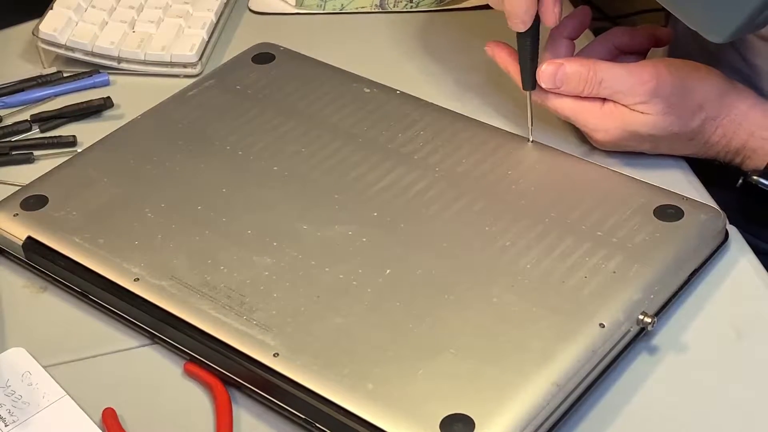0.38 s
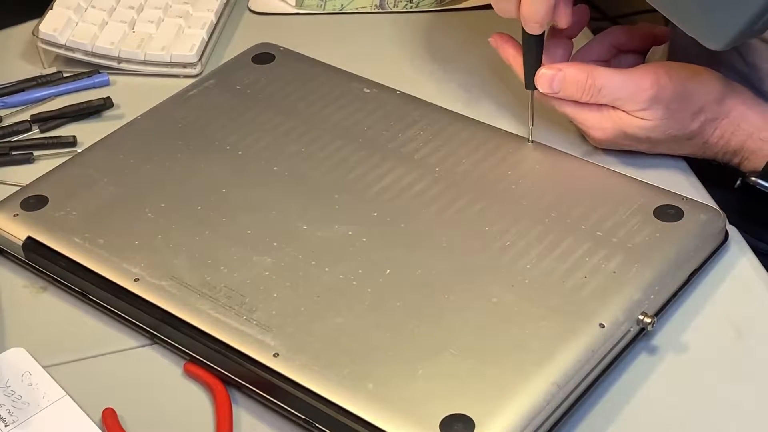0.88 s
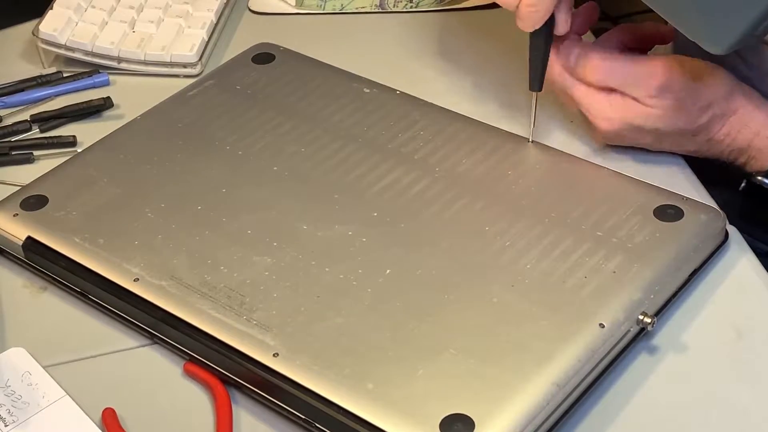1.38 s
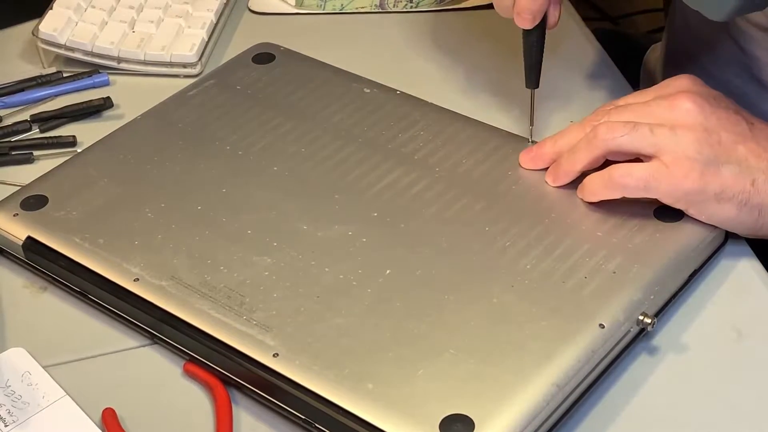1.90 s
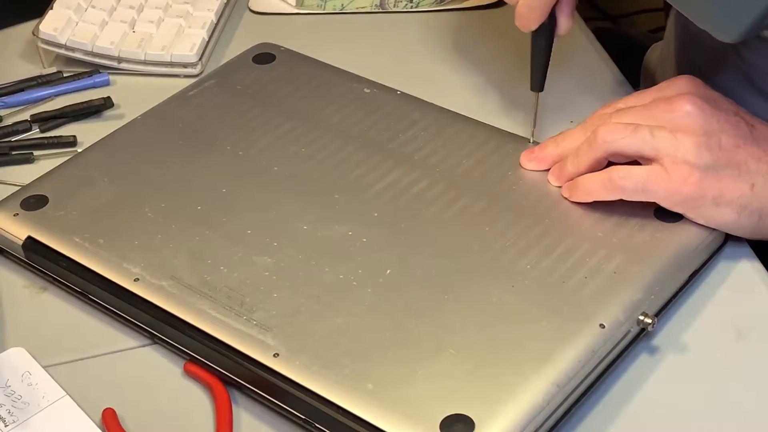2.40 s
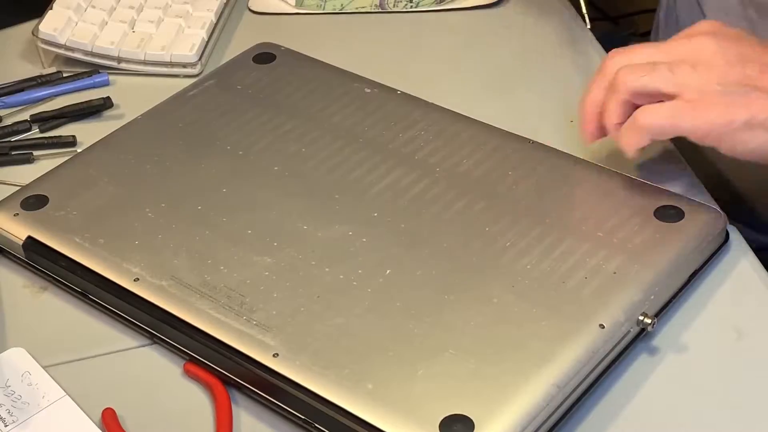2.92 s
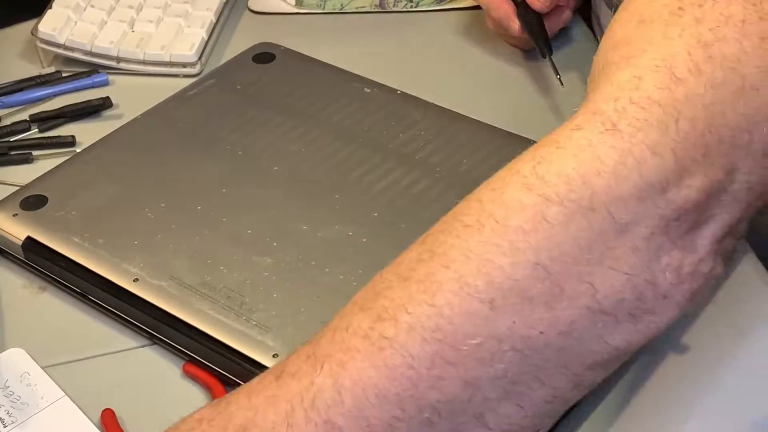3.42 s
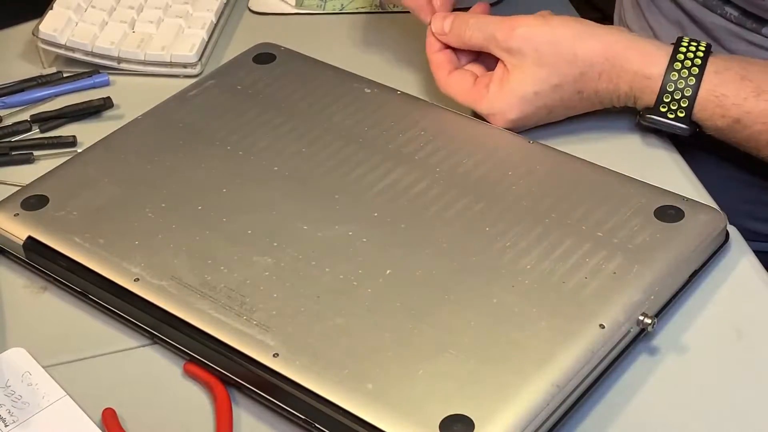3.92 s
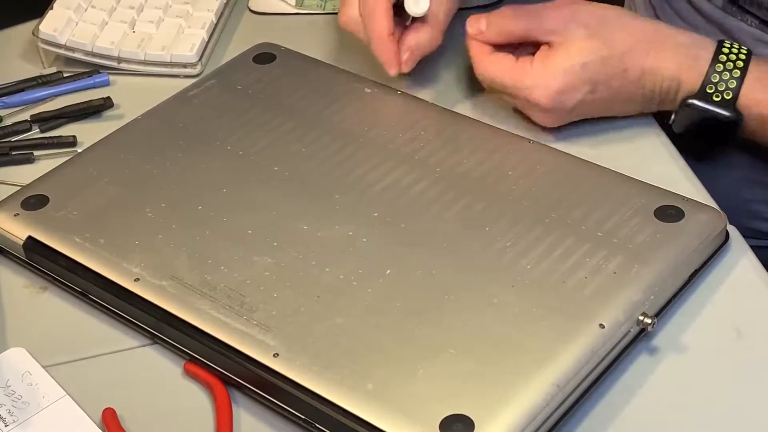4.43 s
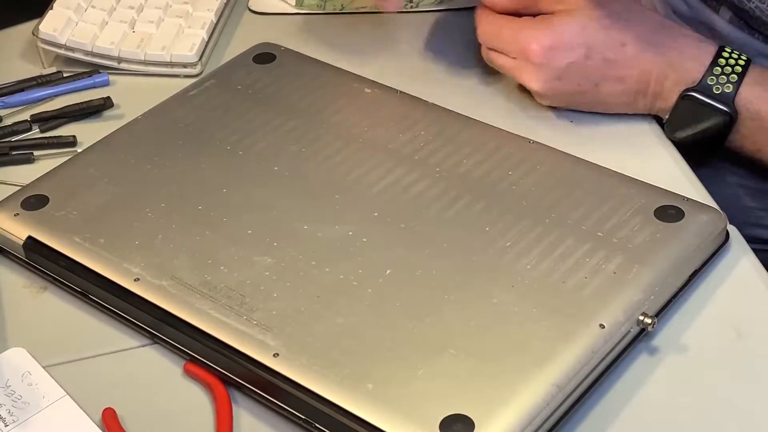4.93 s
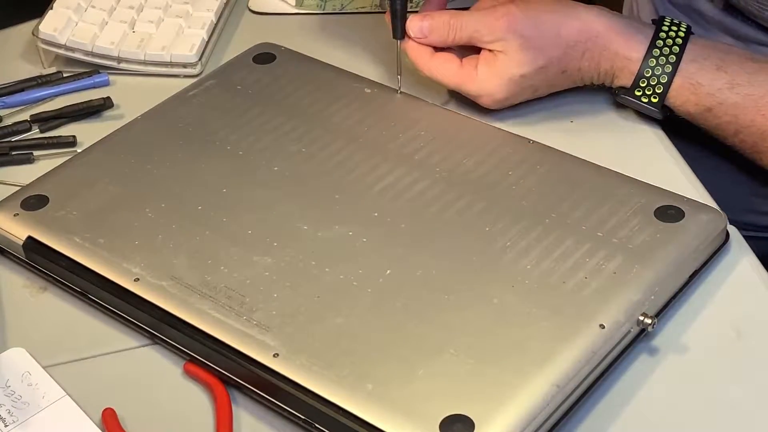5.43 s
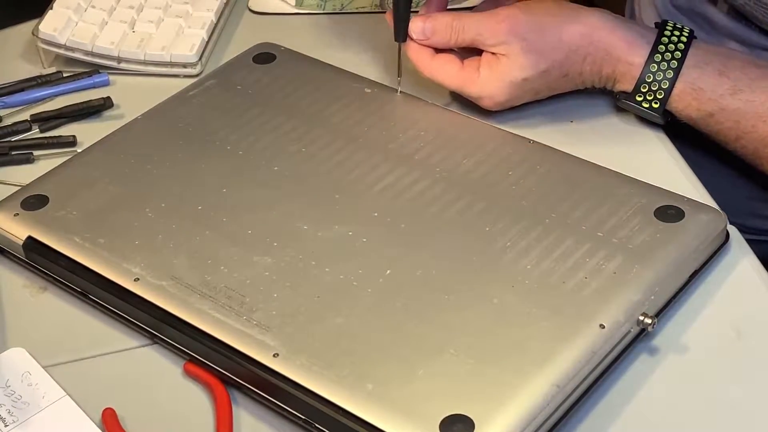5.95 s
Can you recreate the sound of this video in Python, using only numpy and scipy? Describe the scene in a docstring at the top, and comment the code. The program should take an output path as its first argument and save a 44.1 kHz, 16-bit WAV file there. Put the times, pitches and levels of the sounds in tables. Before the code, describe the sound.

Sparse light metallic clicks and dull little knocks on a thin metal case, clustering around four seconds, then a brief scrape and near silence.

```python
"""On a desk in a small room, a small screwdriver and loose screws tick and knock on a metal laptop case.
Each knock is a noisy crack, a set of fading case tones and a late desk thud; steel parts ring thinly.
One short scrape and faint finger rubs are made of many tiny clicks sent through ringing filters.
The room answers with fading noise; below lie filtered-noise rumble, whirr and hiss, and a wavering hum."""
import sys
import numpy as np
from scipy import signal
from scipy.fft import rfft, irfft, next_fast_len
from scipy.io import wavfile

SR = 44100
rng = np.random.default_rng(int(sys.argv[2]) if len(sys.argv) > 2 else 0)


def transcribe(u):
    """Save the signal u as a 16-bit wav file named by the first command-line argument.

    u: samples, shape (n,) or (channels, n), limited to [-1, 1]; the rate is SR.
    q: integer samples, one column per channel.
    """
    v = np.clip(np.atleast_2d(u).T, -1, 1)
    q = np.round(v * 32767).astype(np.int16)
    wavfile.write(sys.argv[1], SR, q)


def gain_from_db(level_db):
    """Convert decibel levels to linear amplitude factors (20 dB per decade)."""
    decades = np.asarray(level_db, float) / 20
    return 10 ** decades


N = 267731   # length in samples

# Slow swell of the background: [t/s, rumble level/dB, whirr level/dB]
BACKGROUND_SWELL = [(0.0, -70, -83), (0.5, -67, -83), (1.1, -68.5, -81), (1.7, -67.5, -82),
                    (2.3, -65.5, -91), (2.75, -67, -88), (3.2, -64.5, -81), (4.0, -64.5, -80.5),
                    (4.4, -65.5, -91), (5.2, -70.5, -83.5), (5.5, -68, -90.5), (6.07, -67.5, -88)]
# Colour of the building's rumble, relative levels: [f/Hz, level/dB]
RUMBLE_COLOUR = [(15, -47.5), (25, -17), (64, -1.5), (130, -6.5), (160, -7.5), (184, -17.5), (220, -4),
                 (255, -15), (325, -23.5), (361, -22), (407, -20), (445, -26.5), (708, -21), (900, -42.5),
                 (1170, -77), (1980, -120)]
# Colour of the microphone hiss, relative levels: [f/Hz, level/dB]
HISS_COLOUR = [(300, 2), (900, -0.5), (2000, -3), (5000, -6), (9000, -7), (13000, -2.5), (15500, -3)]
# Path of the low hum: [t/s, pitch f/Hz, level/dB]
HUM_PATH = [(3.45, 215.5, -78), (3.52, 217.8, -68), (3.624, 217.5, -66.5), (3.68, 221.6, -52),
            (3.75, 230.6, -75), (3.82, 232.6, -67.5), (3.95, 234.3, -64), (4.066, 233.3, -57.5),
            (4.19, 243.2, -49), (4.25, 240, -83), (4.56, 218, -86), (4.6, 221, -78), (4.71, 220.5, -58.5),
            (4.82, 223, -65.5), (4.86, 223.5, -90.5), (5.44, 226.6, -91.5), (5.5, 220.5, -71),
            (5.7, 221, -81)]
# Time the room takes to fade by 60 dB: [f/Hz, fade time/s]
ROOM_FADE = [(150, 0.31), (700, 0.23), (1800, 0.2), (5000, 0.24), (13000, 0.14)]
# Strength of the sound sent into the room: [f/Hz, level/dB]
ROOM_COLOUR = [(150, -0.5), (600, -6), (1500, -4), (4000, -4.5), (8000, -6), (14000, -6.5)]
# How alike left and right are in spread-out sound: [f/Hz, likeness from 0 to 1]
LIKENESS = [(100, 0.86), (290, 0.78), (640, 0.076), (1200, 0.0094)]
# Rubs of fingers and tool: [start t/s, time at full strength/s, level/dB, brightness/dB]
RUBS = [(0.38, 0.0057, -71, -20), (0.46, 0.019, -70, -5), (0.804, 0.0072, -72, -6), (1.365, .035, -82, -10),
        (1.974, 0.048, -75.5, -2.5), (2.253, 0.066, -63, -7), (2.49, 0.059, -58.5, -5.5),
        (2.668, 0.011, -81, -9), (2.86, 0.01, -77, -2.5), (3.91, 0.15, -81.5, -17.5),
        (4.431, 0.041, -79, -2), (4.528, 0.0048, -79, -14.5), (4.551, 0.0135, -64.5, -8.5),
        (4.672, .022, -71, 1), (4.76, .08, -68, -8)]
# Course of the scrape before its final mix level: [t/s, level/dB, brightness/dB]
SCRAPE_COURSE = [(4.843, -52, -8.5), (4.853, -38, -1.5), (4.903, -36.5, -7.5), (4.929, -32.5, 2.5),
                 (4.961, -56.5, -5), (5.0, -71.5, -1)]
# Hollow tones in the scrape: [f/Hz, width/Hz, level/dB]
SCRAPE_TONES = [(464, 100, -4.5), (729, 220, -0.5), (1430, 415, -0.5), (1872, 200, -2.5)]
# Colour of the scrape's hiss, relative levels: [f/Hz, level/dB]
SCRAPE_HISS_COLOUR = [(1290, -55.5), (2200, -5), (3100, -8.5), (4630, -8), (5450, -15), (10600, -11),
                      (11600, -14.5), (15500, -10)]
# A loose screw touches the tip: [t/s, peak level/dB], before a random change in each tone
SCREW_TICKS = [(4.529, -57), (4.5516, -61), (4.564, -57), (4.5779, -58.5)]
# Tones of the screw: [f/Hz, level/dB, time to fade by 60 dB/s]
SCREW_TONES = [(1300, -9, .03), (2380, -8.5, 0.032), (4050, -7, 0.02), (6510, -9, 0.017)]
# The steel tip strikes metal: [t/s, peak level/dB], before a random change in each tone
TIP_PINGS = [(0.4756, -68), (0.8076, -60), (1.0223, -43.5), (2.2044, -71), (2.2508, -57), (2.801, -69.5),
             (3.4647, -59), (4.1355, -31.5)]
# Tones of the tip: [f/Hz, level/dB, time to fade by 60 dB/s]
TIP_TONES = [(550, -1, 0.037), (1710, -4.5, 0.022), (4385, -2, 0.015), (4600, -7.5, 0.0139),
             (7300, -17.5, 0.0074), (10560, 2, .012)]
# Tones of the desk top: [f/Hz, level/dB, time to fade by 60 dB/s, delay/s]
DESK_TONES = [(48.4, -5.5, .2, 0.028), (81, -2.5, 0.18, 0.036), (100.2, -4, .12, 0.022),
              (125.4, -1, 0.14, .03), (182.5, -1.5, 0.12, 0.0081), (250, -8.5, 0.093, 0.0071),
              (315, -16.5, 0.036, .003)]
# Tones of the laptop case: [f/Hz, level/dB, time to fade by 60 dB/s]
CASE_TONES = [(359, -12.5, 0.057), (575, 1.5, 0.018), (790, -7, 0.035), (1136, -9.5, 0.082),
              (1277, 5.5, 0.012), (1613, 12.5, 0.0047), (1952, 1, 0.013), (2314, 2, 0.008),
              (2773, 1.5, 0.0071), (3067, 1.5, 0.0077), (3670, -4, 0.0038), (4120, -8.5, 0.029),
              (4610, -4.5, 0.023), (5260, 6, 0.0023), (6310, -19.5, .006), (8100, -10.5, .006),
              (8000, -21, 0.015), (10080, -2, 0.0042), (13930, 4, 0.0089)]
# Knocks: [t/s, base level/dB, dull part/dB, hard bright part/dB, desk thud/dB], parts relative to base
KNOCKS = [(0.382, -56, -22, -21.5, -37), (0.8084, -52.5, -11, -12, -29), (1.0222, -47.5, -3.5, 1, -26),
          (1.1682, -22.5, -4.5, -19, -15.5), (1.2576, -44.5, -3, -37, -19), (1.3667, -49.5, -10, -21, -29),
          (2.1137, -56.5, -8, -24, -33), (2.2033, -50, 0, -14, -26), (2.2503, -48, -1.5, -7, -21),
          (2.378, -66, -17, -12, -12), (2.4732, -35.5, 2.5, -3.5, -15.5), (2.525, -48.5, -5, -4, -28),
          (2.5576, -47.5, 3, -10, -16), (2.8631, -62, -10, -21, -23), (3.0012, -38, -2, -16, -12.5),
          (3.4669, -51, -2.5, -4, -11), (3.6626, -64, 5, -21, -26), (3.913, -65, 5, -13, -21.5),
          (3.944, -61, -15, -24, -28), (4.0198, -22.5, -8, -11, -18), (4.137, -23, -6.5, -11.5, -18.5),
          (4.153, -18, -8.5, -17, -25), (4.6773, -56, -6, -6, -24), (4.6988, -30, 1, -8, -22.5)]
# Share of the right channel's power taken from the left: [f/Hz, share from 0 to 1]
SHARED_TREBLE = [(6500, 0.0072), (8500, 0.034), (10500, 0.99), (14000, 1)]
# Lift of left over right: [f/Hz, level/dB]
LEFT_LIFT = [(200, 1.5), (700, 2.5), (2400, 2.5), (6000, -1)]

HZ = np.fft.rfftfreq(next_fast_len(N), 1 / SR)
BEND_HZ = 3850   # above this the right channel runs early


def rms_one(x):
    """Scale a sound to an average (rms) strength of 1."""
    return x / np.sqrt(np.mean(x ** 2) + 1e-20)


def in_time(rows, outside=None):
    """Draw each column of a table as a curve over all samples."""
    s, *columns = np.transpose(rows)
    t = np.arange(N) / SR
    return [np.interp(t, s, column, outside, outside) for column in columns]


def at_hz(points, hz):
    """Read a curve between its points on a logarithmic pitch scale."""
    points = np.array(points)
    return np.interp(np.log(hz + 1), np.log(points[:, 0]), points[:, 1])


def shaped(x, gains):
    """Make each frequency stronger or weaker, or shift it in time."""
    size = next_fast_len(N)
    return irfft(rfft(x, size) * gains, size)[..., :N]


def cut(x, hz, kind):
    """Remove lows, highs or both with a second-order Butterworth filter."""
    return signal.sosfilt(signal.butter(2, hz, kind, fs=SR, output="sos"), x + 1e-18)


def ring(x, hz, t60):
    """Let each unit click start a sine of height 1 that fades by 60 dB in t60 seconds."""
    shrink = gain_from_db(-60 / (t60 * SR))
    step = 2 * np.pi * hz / SR
    return signal.lfilter([0, np.sin(step)], [1, -2 * shrink * np.cos(step), shrink * shrink], x + 1e-18)


def clicks(s, gains):
    """Place single impulses at the given times."""
    out = np.zeros(N)
    out[np.round(np.asarray(s) * SR).astype(int)] = gains
    return out


def grains(per_s, spread_db):
    """Scatter random clicks of uneven size, with an rms of 1 overall."""
    sizes = gain_from_db(spread_db * np.minimum(rng.exponential(1, N), 5)) * rng.choice([-1, 1], N)
    return rms_one(sizes * (rng.random(N) < per_s / SR))


def to_right(x):
    """Make the treble reach the right port a third of a millisecond early; the bass stays in step."""
    turn_hz, knee_hz = 3200, 300   # one whole turn of phase per 3200 Hz, with a soft start
    turns = knee_hz * np.logaddexp(0, (HZ - BEND_HZ) / knee_hz) / turn_hz
    return shaped(x, np.exp(2j * np.pi * turns))


def diffuse(mid, side):
    """Turn two unrelated signals into left and right, alike only in the bass."""
    alike = np.clip(at_hz(LIKENESS, HZ), 0, 1)
    mid = shaped(mid, np.sqrt((1 + alike) / 2))
    side = shaped(side, np.sqrt((1 - alike) / 2))
    return np.array([mid + side, mid - side])


def background(patchy_db=5.5, hiss_db=-77, whirr_hz=660, whirr_width_hz=90):
    """Shape noise into building rumble, a faint whirr in patches and microphone hiss."""
    rumble = diffuse(*shaped(rng.standard_normal((2, N)), gain_from_db(at_hz(RUMBLE_COLOUR, HZ))))
    whirr = rms_one(ring(rng.standard_normal((2, N)), whirr_hz, 2.5 / whirr_width_hz))
    rumble_db, whirr_db = in_time(BACKGROUND_SWELL)
    slow_noise = rms_one(cut(rng.standard_normal(N), 6, "low"))
    patches = gain_from_db(whirr_db + patchy_db * slow_noise)
    hiss = shaped(rng.standard_normal((2, N)), gain_from_db(at_hz(HISS_COLOUR, HZ)) * (HZ < 16000))
    return gain_from_db(rumble_db) * rms_one(rumble) + patches * whirr + gain_from_db(hiss_db) * rms_one(hiss)


def hum(rough=0.2):
    """Add up a sine's wandering pitch step by step, while its strength swells and flutters."""
    flutter = 1 + rough * rms_one(cut(rng.standard_normal(N), 8, "low"))
    hz, _ = in_time(HUM_PATH)
    _, level_db = in_time(HUM_PATH, -120)   # silent before and after the path
    tone = np.sin(2 * np.pi * np.cumsum(hz) / SR)
    return np.sqrt(2) * gain_from_db(level_db) * flutter * tone


def room(x, gap_s=0.0027):
    """Imitate reflections by noise that sets in after a gap and dies away band by band."""
    t, answer = np.arange(SR // 2) / SR, 0
    edges = 80 * 2 ** np.arange(0, 8.1)   # octave bands
    for low, high in zip(edges, np.minimum(edges[1:], 20000)):
        onset = np.clip(t / gap_s - 0.5, 0, 1)
        fall = gain_from_db(-60 * t / at_hz(ROOM_FADE, np.sqrt(low * high))) * onset
        answer = answer + cut(rng.standard_normal((2, len(t))), [low, high], "band") * fall
    answer = answer / np.sqrt(np.sum(answer ** 2, axis=1, keepdims=True))
    return diffuse(*signal.fftconvolve(x[None], answer, axes=1)[:, :N])


def rubs(rise_db_per_s=1500, fall_db_per_s=705):
    """Skin and tool graze the case: fine clicks stir its tones and some treble, rising, holding and fading."""
    fine = grains(2000, spread_db=3.5)
    body = rms_one(sum(gain_from_db(db) * ring(fine, hz, t60) for hz, db, t60 in CASE_TONES[1:14]))
    top = rms_one(cut(fine, [3500, 15000], "band"))
    t, out = np.arange(N) / SR, np.zeros(N)
    for start_s, length_s, level_db, bright_db in RUBS:
        rise_loss_db = rise_db_per_s * np.maximum(start_s - t, 0)
        fall_loss_db = fall_db_per_s * np.maximum(t - start_s - length_s, 0)
        out += gain_from_db(level_db - rise_loss_db - fall_loss_db) * (body + gain_from_db(bright_db) * top)
    return out


def scrape():
    """Something drags over the desk: dense slips ring a few hollow tones, with a hiss of finer clicks."""
    level_db, bright_db = in_time(SCRAPE_COURSE, -120)
    slips = grains(3000, spread_db=3.0)
    body = 0
    for k, (hz, width_hz, db) in enumerate(SCRAPE_TONES):
        body = body + (-1) ** k * gain_from_db(db) * rms_one(ring(slips, hz, 1.3 / width_hz))
    hiss = rms_one(shaped(grains(9000, spread_db=3.5), gain_from_db(at_hz(SCRAPE_HISS_COLOUR, HZ))))
    return gain_from_db(level_db) * (rms_one(body) + gain_from_db(bright_db) * hiss)


def ticks(events, tones):
    """Each touch sets a small steel part ringing in a few thin tones of slightly random strength."""
    s, peak_db = np.transpose(events)
    strength = gain_from_db(peak_db[:, None] + 2.0 * rng.standard_normal((len(s), len(tones))))
    out = 0
    for k, (hz, db, t60) in enumerate(tones):
        out = out + ring(clicks(s, gain_from_db(db) * strength[:, k]), hz, t60)
    return out


def cracks(crack_s=0.0011, crack_db=7.0):
    """Hard contact gives a tiny noise burst that swells, crests at the knock and dies; only treble is kept."""
    s, base_db, _, bright_db, _ = np.transpose(KNOCKS)
    t = np.arange(600) / SR
    swell = t / crack_s * np.exp(1 - t / crack_s)
    bursts = rng.standard_normal((len(s), len(t))) * swell
    starts = np.round((s - crack_s) * SR).astype(int)
    out = np.zeros(N)
    for start, gain, burst in zip(starts, gain_from_db(base_db + bright_db + crack_db), bursts):
        out[start:start + len(t)] += gain * burst
    return cut(out, 4800, "high")


def case_ringing(strength, middle_db=-11.0, soft_hz=1500, hard_hz=5000, late_cycles=1.128,
                 spread_s=0.0015, aside_s=0.0003):
    """Bending waves make the case ring in many tones; low ones arrive later, left and right differ a little."""
    s, base_db, dull_db, bright_db, _ = np.transpose(KNOCKS)
    wait, aside = rng.random(strength.shape), rng.standard_normal(strength.shape)
    case = np.zeros((2, N))
    for k, (hz, level_db, t60) in enumerate(CASE_TONES):
        hardness = np.clip(np.log(hz / soft_hz) / np.log(hard_hz / soft_hz), 0, 1)
        colour_db = hardness * bright_db + (1 - hardness) * middle_db if hz > 900 else dull_db
        gains = (-1) ** k * gain_from_db(base_db + level_db + colour_db) * strength[:, k]
        at = s + late_cycles / hz + spread_s * wait[:, k]
        apart = aside_s * aside[:, k] * (hz < BEND_HZ)   # each tone leaves its own part of the lid
        hits = np.array([clicks(at, gains), clicks(at + apart, gains)])
        case += cut(ring(hits, hz, t60), [hz / 2.01, hz * 1.41], "band")
    return case


def desk_thuds(strength):
    """The heavy desk top swings up late and slowly: two ringing filters in a row build each low tone."""
    s, base_db, _, _, thud_db = np.transpose(KNOCKS)
    desk = 0
    for k, (hz, level_db, t60, delay_s) in enumerate(DESK_TONES):
        hit = clicks(s + delay_s, gain_from_db(base_db + thud_db + level_db) * strength[:, -1 - k])
        desk = desk + ring(ring(hit, hz, 0.11), hz, t60) * hz / SR
    return desk


def knocks():
    """Each knock joins a bright crack and the ringing case; its desk thud is returned separately."""
    strength = gain_from_db(2.0 * rng.standard_normal((len(KNOCKS), 32)))   # every tone varies from knock to knock
    return cracks() + case_ringing(strength), desk_thuds(strength)


def scene(scrape_pan_db=1.0):
    """Touches and scrape arrive directly and through the room; the scrape lies slightly to the left."""
    case, desk = knocks()
    dragged = scrape()
    touched = case + ticks(SCREW_TICKS, SCREW_TONES) + ticks(TIP_PINGS, TIP_TONES) + rubs()
    pan = gain_from_db([[scrape_pan_db / 2], [-scrape_pan_db / 2]])
    left, right = touched + gain_from_db(-2.5) * dragged * pan
    wet = room(shaped(touched[0] + gain_from_db(5.5) * dragged, gain_from_db(at_hz(ROOM_COLOUR, HZ))))
    return np.array([left, to_right(right)]) + wet + desk + hum() + background()


def roll_off(x):
    """The treble ends steeply here."""
    return signal.sosfilt(signal.butter(12, 16520, fs=SR, output="sos"), x)


def record(dry):
    """Trim both ends of the spectrum, share left treble with the right and lean left in the middle range."""
    low_cut_hz, top_cut_hz = 16, 14900
    trimmed = cut(dry, low_cut_hz, "high")
    left, right = cut(cut(trimmed, top_cut_hz, "low"), top_cut_hz, "low")   # twice, for a steeper cut
    share = np.clip(at_hz(SHARED_TREBLE, HZ), 0, 1)
    right = shaped(right, np.sqrt(1 - share)) + shaped(to_right(left), np.sqrt(share))
    lift = gain_from_db(at_hz(LEFT_LIFT, HZ) / 2)   # half up on the left, half down on the right
    passed = HZ < 16500
    mix = np.array([shaped(left, lift * passed), shaped(right, passed / lift)])
    return roll_off(mix)


dry = scene()
out = record(dry)
transcribe(out)
```